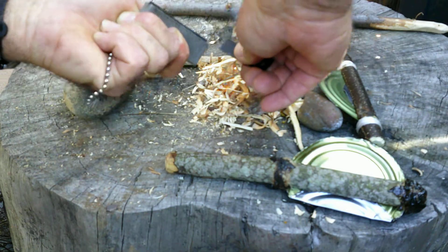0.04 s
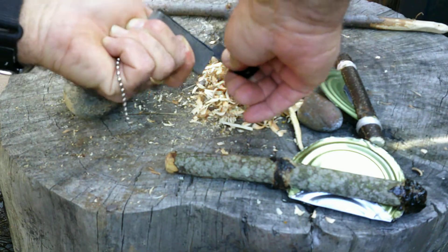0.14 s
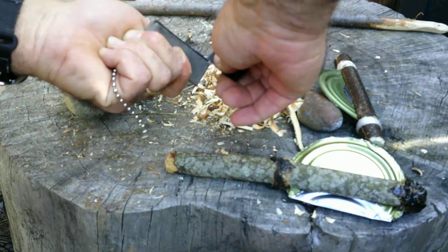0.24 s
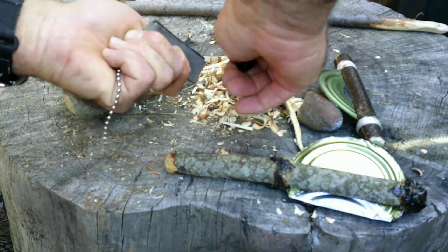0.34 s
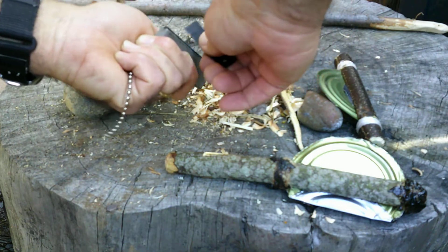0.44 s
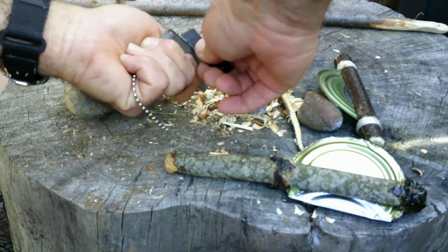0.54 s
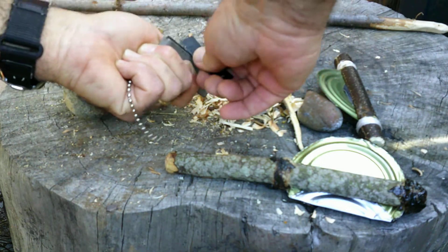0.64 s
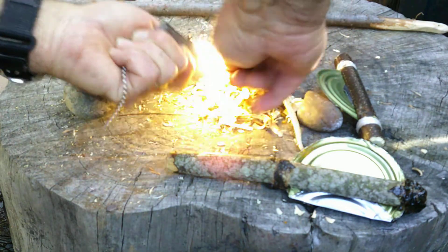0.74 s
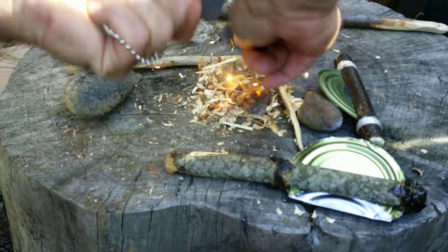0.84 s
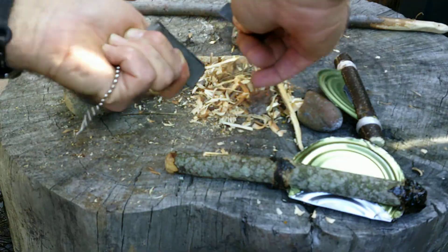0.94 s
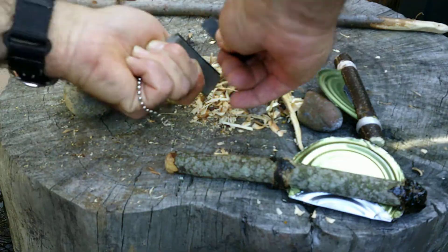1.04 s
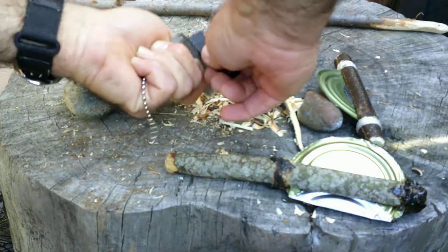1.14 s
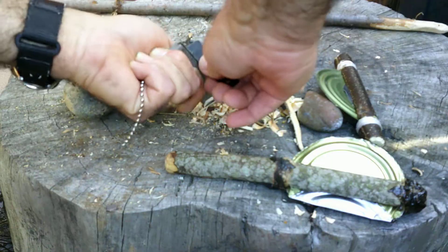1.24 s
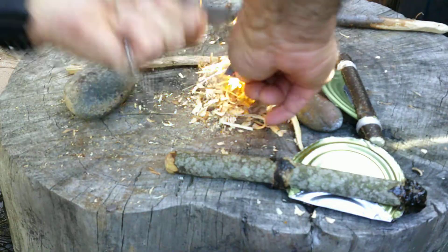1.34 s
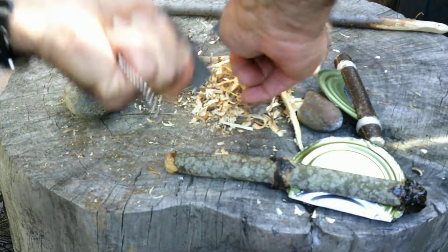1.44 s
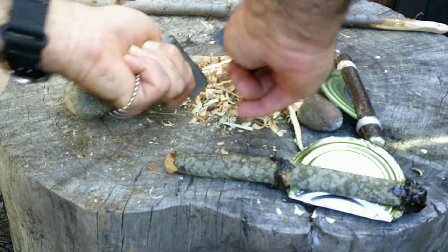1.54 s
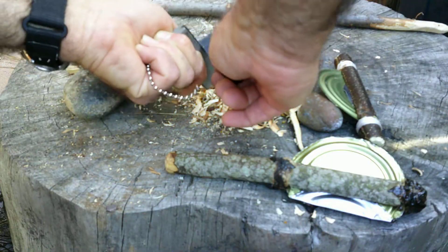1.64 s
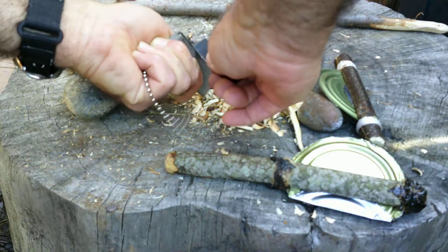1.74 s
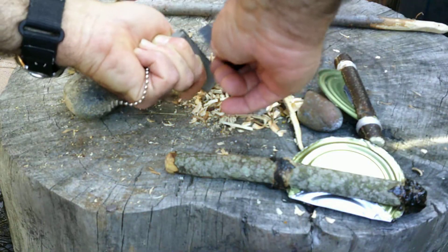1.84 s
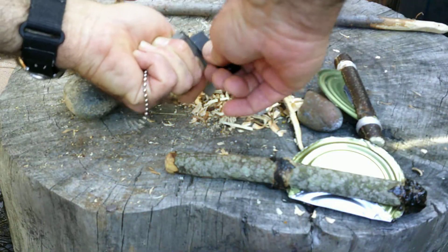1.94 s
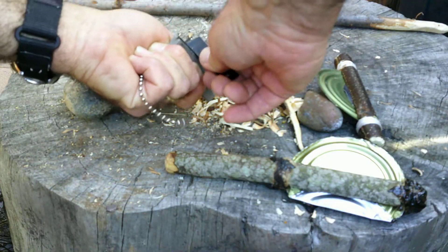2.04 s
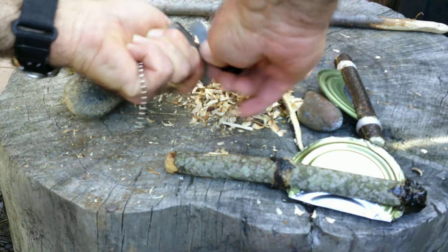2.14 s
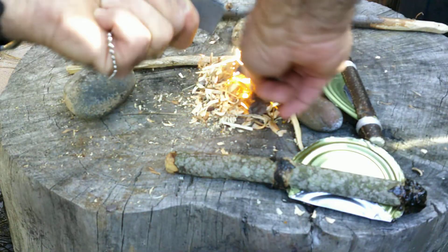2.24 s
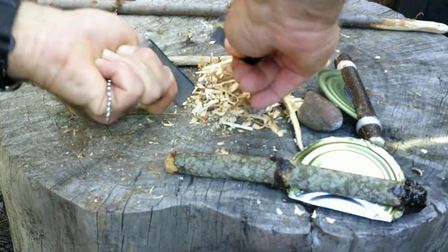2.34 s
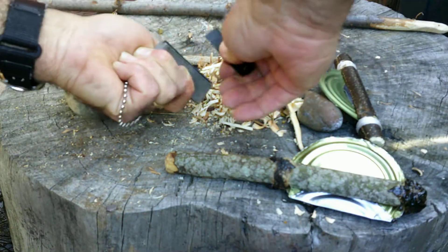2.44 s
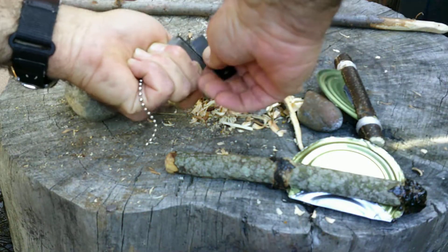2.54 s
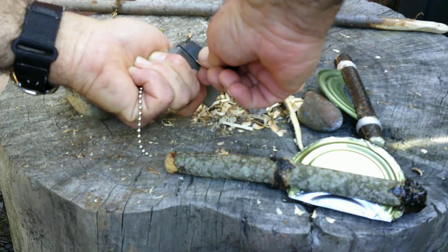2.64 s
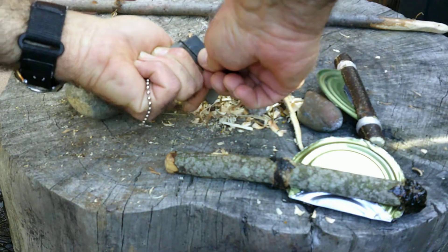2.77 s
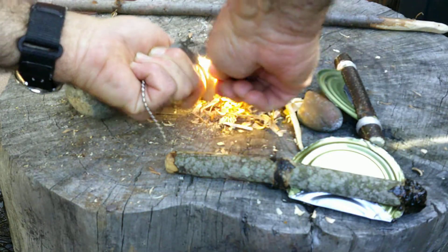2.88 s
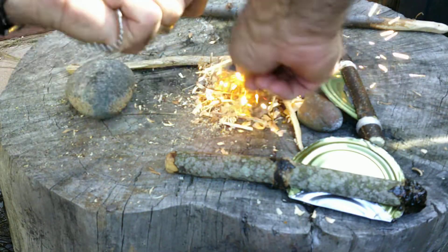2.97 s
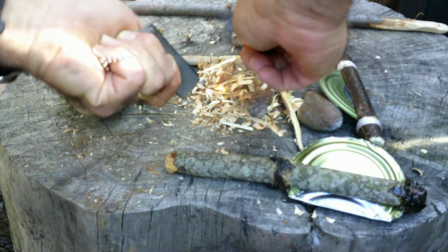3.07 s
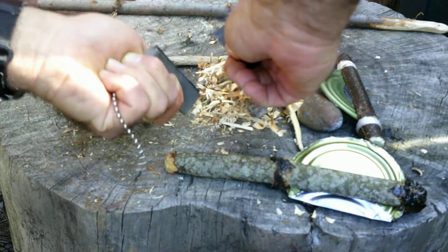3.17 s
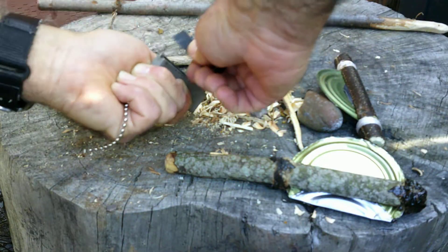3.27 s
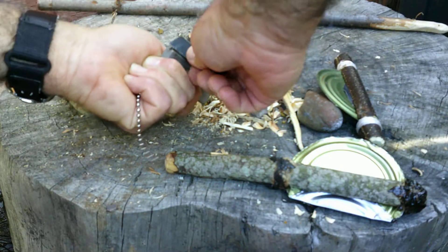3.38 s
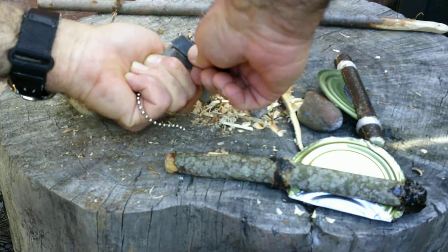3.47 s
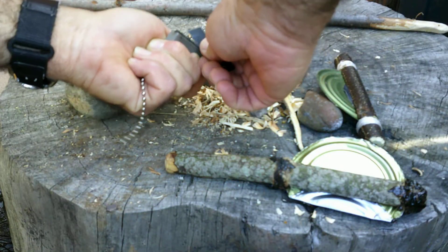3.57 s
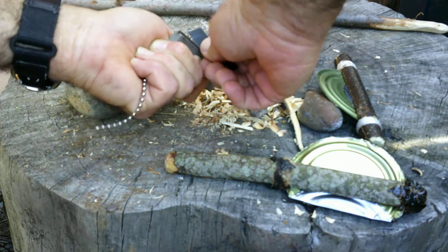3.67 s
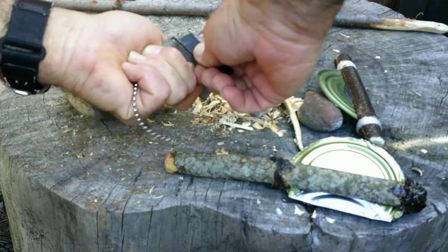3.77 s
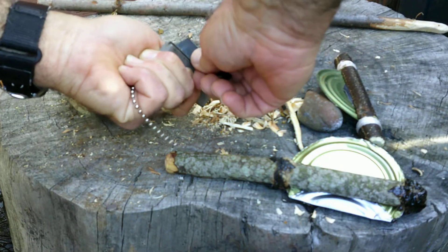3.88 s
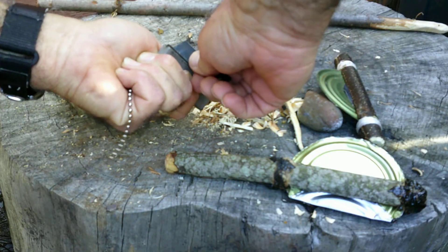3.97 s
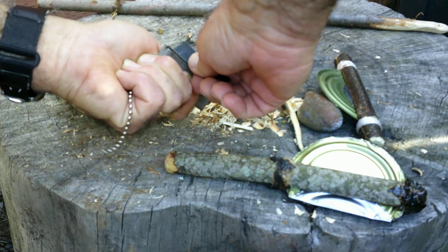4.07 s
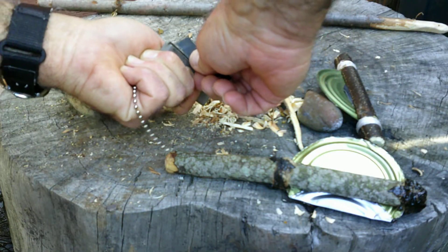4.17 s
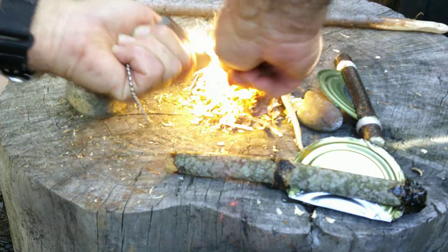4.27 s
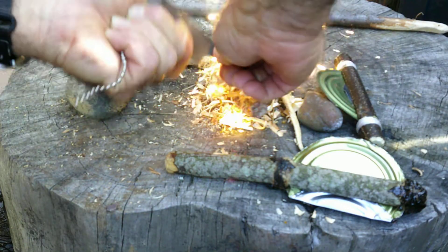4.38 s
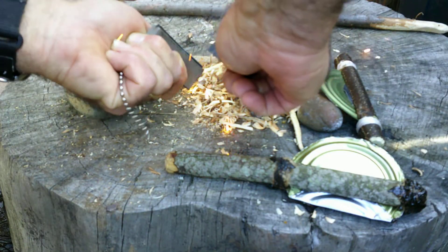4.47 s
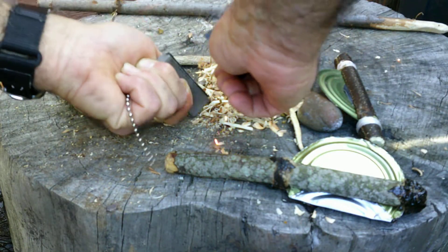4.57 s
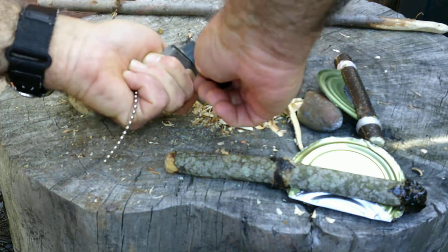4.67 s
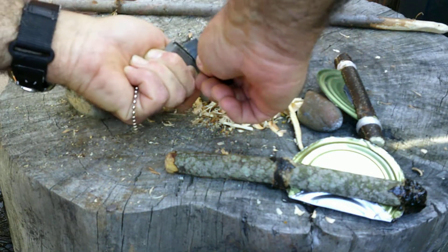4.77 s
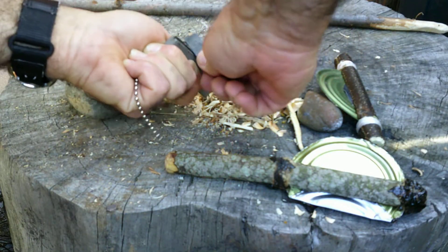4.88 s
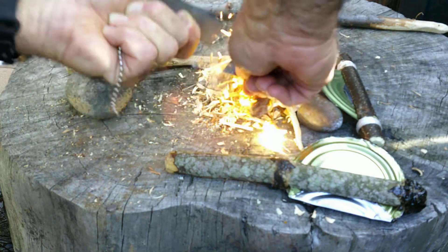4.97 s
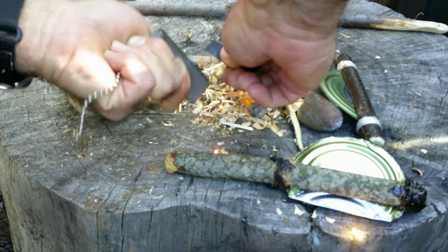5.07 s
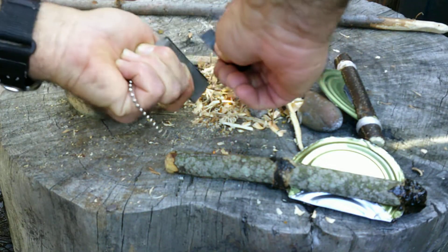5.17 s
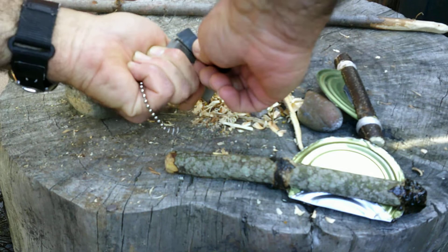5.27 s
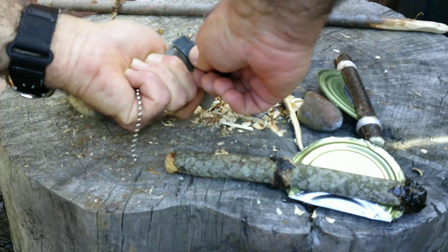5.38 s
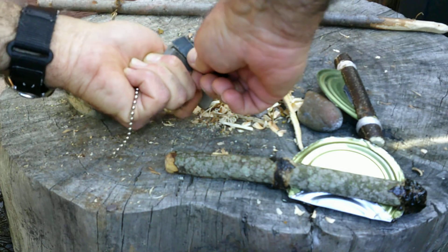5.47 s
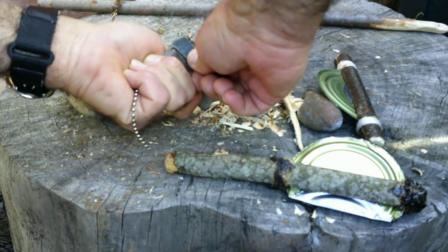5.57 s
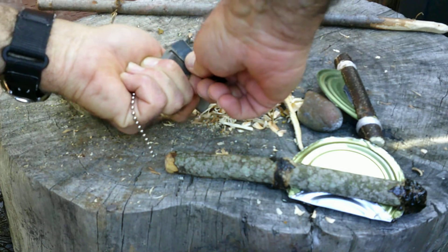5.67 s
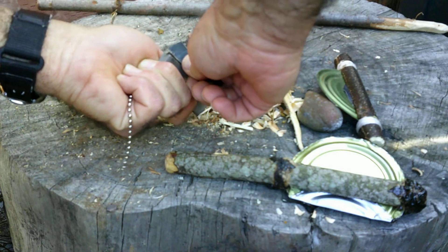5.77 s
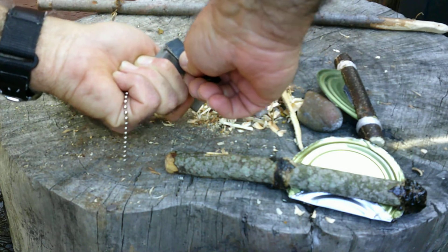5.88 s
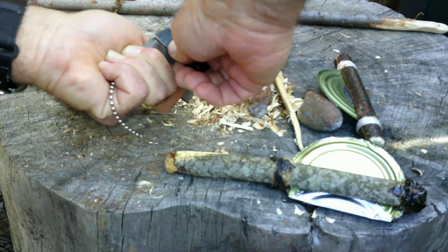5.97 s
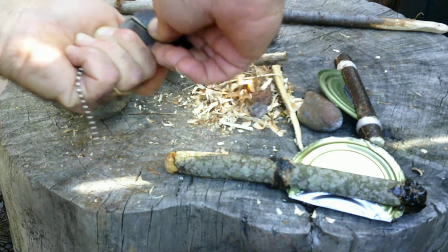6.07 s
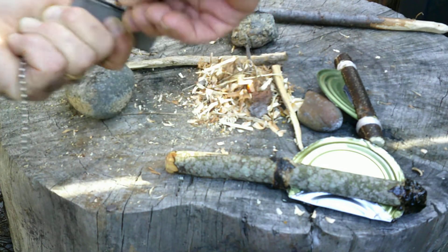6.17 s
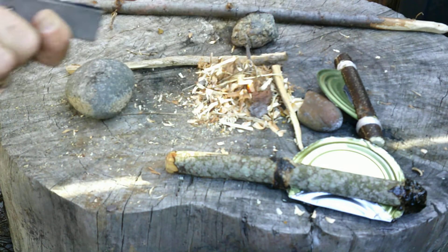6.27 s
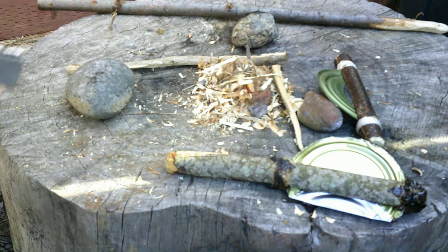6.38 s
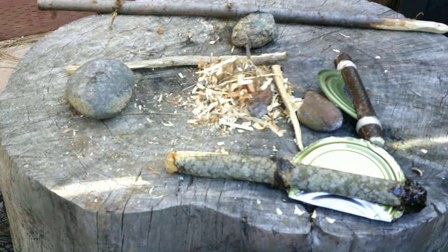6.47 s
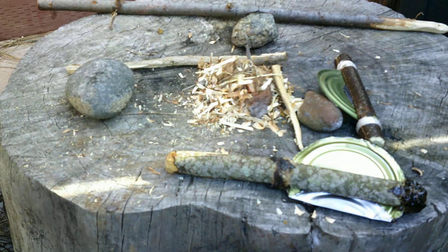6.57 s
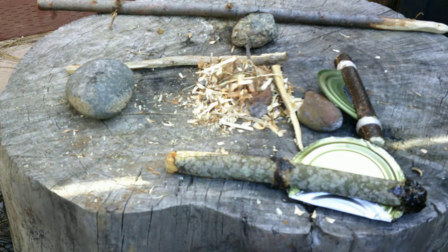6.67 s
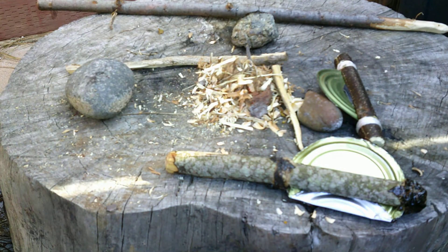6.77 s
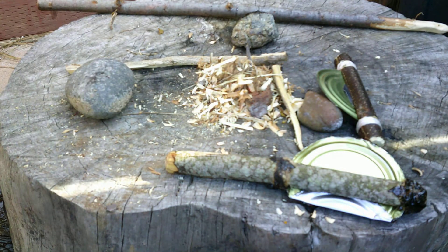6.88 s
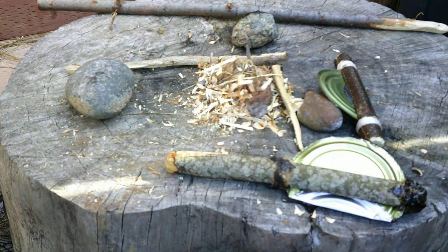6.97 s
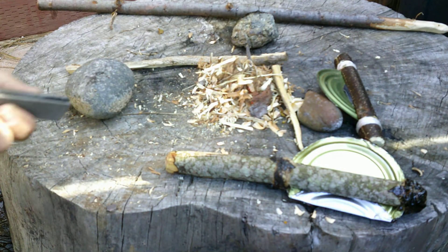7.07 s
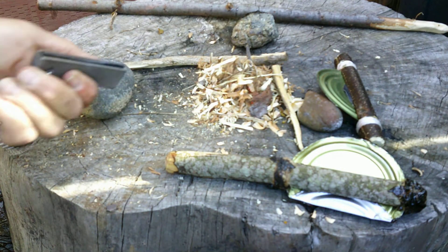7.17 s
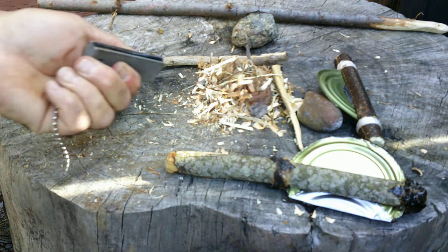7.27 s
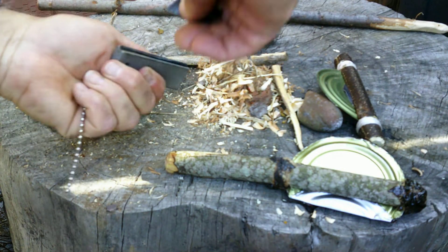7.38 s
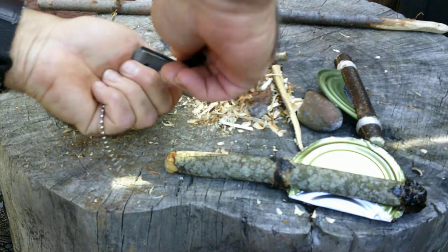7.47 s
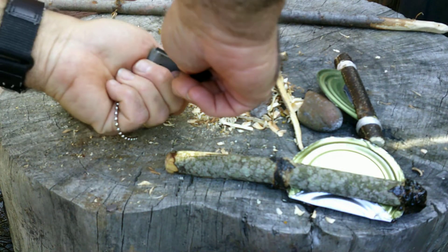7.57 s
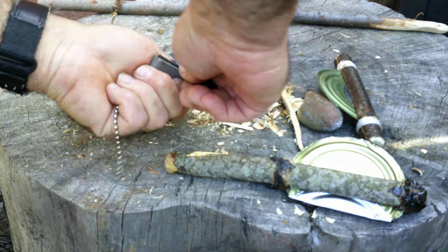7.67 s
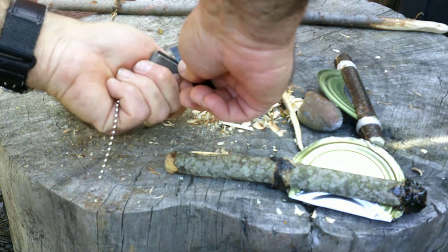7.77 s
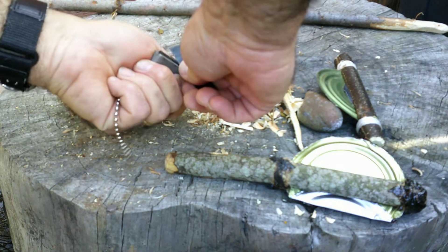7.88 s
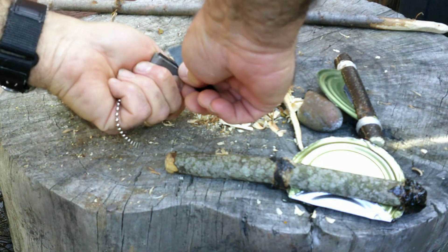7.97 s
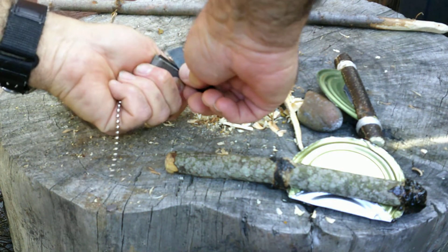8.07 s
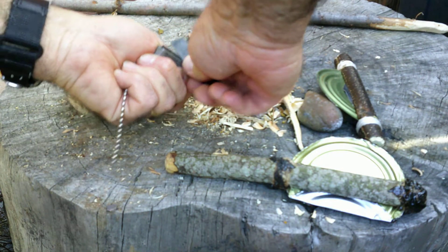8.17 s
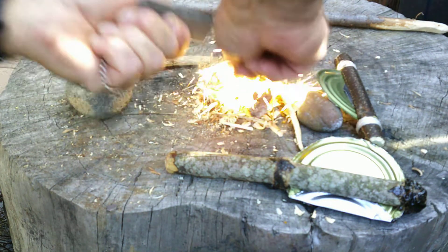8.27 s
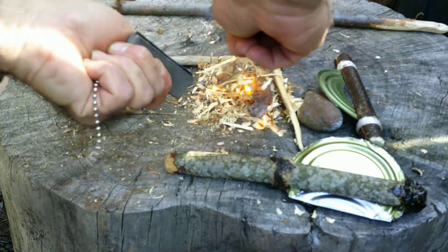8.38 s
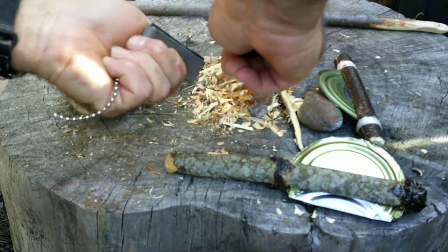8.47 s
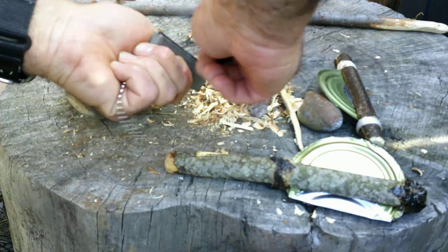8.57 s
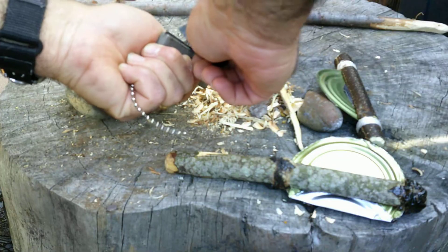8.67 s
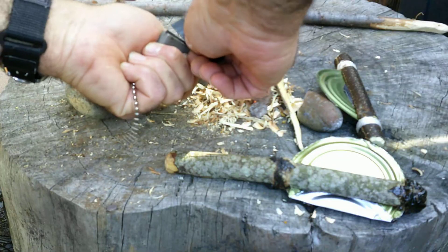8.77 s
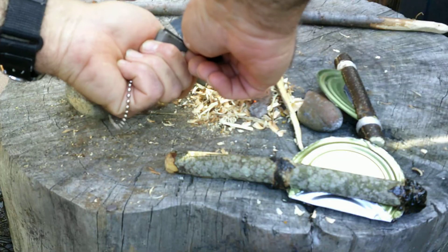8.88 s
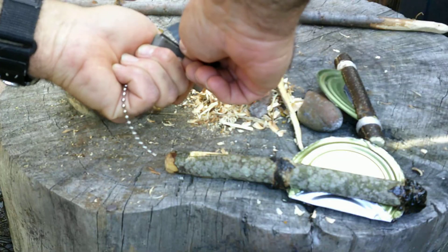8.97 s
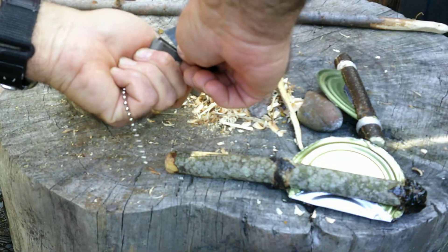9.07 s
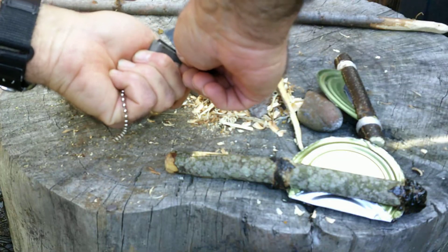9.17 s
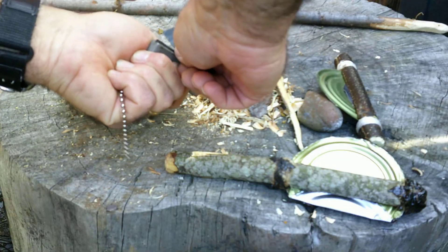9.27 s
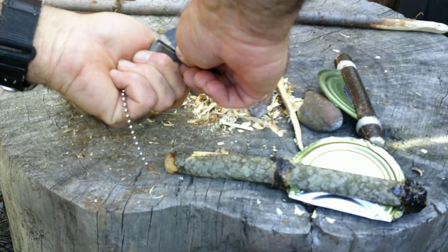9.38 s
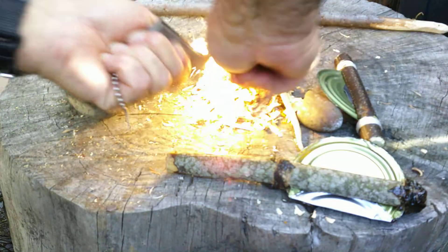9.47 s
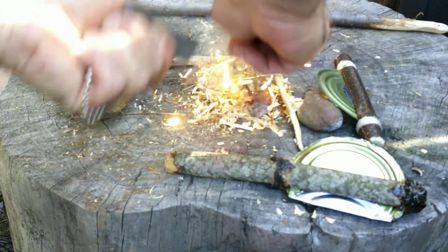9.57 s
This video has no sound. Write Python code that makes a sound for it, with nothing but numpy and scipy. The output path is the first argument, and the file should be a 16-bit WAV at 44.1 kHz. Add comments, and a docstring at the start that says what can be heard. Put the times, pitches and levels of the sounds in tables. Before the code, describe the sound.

Hands work at a wooden stump in the open air, heard close up in one channel with little reverberation and no extreme treble. Damped metallic ticks and light slides precede six very brief, tearing scrapes, each bursting into a soft flare and scattered sparks. Around the middle the scraping stops and dry shavings and twigs rustle gently. The steel is then set again for two louder snagging rasps. Faint bead clicks accompany the movement.

```python
"""Over an outdoor wash, a bead chain jingles, shavings stir, and steel slides and taps on a fire-starter rod.
Eight pushes of the scraper then rasp and snag (noise grains), each with a puff of sparks that crackle out.
Taps are damped modes; slides, rasp, sparks and shavings are random impulses shaped by spectra.
Hand motion drives jingle and stir: most after a stroke, least while aiming; in a pause the hands rummage."""
import sys
import numpy as np
from scipy import signal
from scipy.io import wavfile

SR = 44100
rng = np.random.default_rng(int(sys.argv[2]) if len(sys.argv) > 2 else 0)


def file_out(sig):
    """Save sig as 16-bit WAV at sys.argv[1]."""
    # one column per channel
    cols = np.atleast_2d(sig).T
    # limit, then scale
    lim = np.clip(cols, -1, 1)
    pcm = np.round(lim * 32767).astype(np.int16)
    wavfile.write(sys.argv[1], SR, pcm)


N = 424683  # samples

# pushes of the scraper: start t/s, push length/s, rasp level at the bite/dB, rasp level at the end/dB,
# treble relative level/dB, flare level/dB, burn-out t60/s
STROKES = [(0.699, .037, -49.5, -34, .5, -32.5, .1), (1.244, .051, -55, -33.5, -1, -36, 0.1),
           (2.122, 0.038, -44, -37, 1.5, -33, .1), (2.847, 0.039, -41.5, -35, -3.5, -33.5, 0.18),
           (4.213, .05, -48, -36, 2, -33, 0.2), (4.873, 0.045, -47.5, -32, -1.5, -35, .11),
           (8.161, .054, -50.5, -36.5, .5, -34, 0.26), (9.406, 0.053, -45.5, -36, 3.5, -32, .16)]
# spectrum of the cutting edge: f/Hz, density level/dB
RASP_SPECTRUM = [(150, -29.5), (900, -13.5), (1900, -8), (2350, -13.5), (2650, -3.5), (3400, -2),
                 (4250, -8.5), (4750, -14.5), (5500, -9), (6300, -5), (7100, -0.5), (7800, 2.5),
                 (8500, -14), (9200, -28)]
# hollows between hands and stump that colour the sparks: f/Hz, width/Hz, level/dB
HOLLOWS = [(202, 93, 2.5), (329, 45, 4.5), (454.7, 33, 5), (515, 45, 5), (559, 20, -5), (612, 31, 3.5),
           (674, 30, -8.5), (825, 36, 5.5), (996, 101, 11.5), (1288, 21, 4.5), (1424, 110, 6.5)]


def gain_of(db):
    """Decibel law: level to amplitude ratio."""
    return 10 ** (np.asarray(db) / 20)


def evened(x):
    """Power normalisation: scales to rms 1."""
    return x / np.sqrt(np.mean(x ** 2) + 1e-20)


def add(mix, s, sound):
    """Superposition: mixes a sound in at time s."""
    part = mix[max(round(s * SR), 0):][:len(sound)]
    part += sound[:len(part)]


def colour(x, points, peaks=(), size=4096):
    """Minimum-phase filter of unit energy, from a spectrum with peaks or dips on top of it."""
    hz = abs(np.fft.fftfreq(size, 1 / SR))
    f, db = np.transpose(points)
    db = np.interp(np.log(hz + 1), np.log(f), db)
    for centre, width, height in peaks:
        db = db + height / (1 + (2 * (hz - centre) / width) ** 2)
    # the Hilbert transform of the log gain gives the causal phase
    spectrum = np.exp(np.conj(signal.hilbert(np.log(gain_of(db)))))
    response = np.fft.ifft(spectrum).real
    return signal.fftconvolve(x, response / np.linalg.norm(response))[:len(x)]


def grains(count, per_s, spread_db):
    """Shot noise: random impulses of either sign, a few much larger than the rest, at rms 1."""
    size = gain_of(spread_db * np.minimum(rng.exponential(1, count), 4))
    sign = rng.choice([-1, 1], count)
    return evened(size * sign * (rng.random(count) < per_s / SR))


def burst(length, rise):
    """Envelope of a short gesture: a quick swell, a fade, and a low tail for 20 ms past its length."""
    u = np.arange(int((length + 0.02) * SR)) / SR / length
    return np.interp(u, [0, np.clip(rise, .01, .6), .7, 1.2], [0.25, 0.96, 0.7, 0.11])


def air(level_db=-59):
    """Stationary noise: the low, even wash of the outdoors."""
    # f/Hz, density level/dB
    air_spectrum = [(12, -39), (20, -12), (93, -3), (147, -3), (176, -3.5), (205, -6), (324, -10),
                    (369, -11.5), (501, -14.5), (857, -19), (974, -20.5), (2150, -26.5), (4870, -37.5),
                    (7720, -31.5), (9000, -55), (11700, -84.5), (19800, -120)]
    return gain_of(level_db) * colour(rng.standard_normal(N), air_spectrum)


def hand_motion(jolt_db=8.5, settle_s=.3, still_db=-8, aim_s=0.32):
    """Exponential relaxation: a gain jolted by each stroke, and unsettled at first; it falls before the next."""
    t = np.arange(N) / SR
    starts, pushes = np.transpose(STROKES)[:2]
    ends = starts + pushes
    done = np.searchsorted(ends, t)
    since = t - np.append(0, ends)[done]
    until = np.append(ends, np.inf)[done] - t
    return gain_of(jolt_db * np.exp(-since / settle_s) + still_db * np.exp(-until / aim_s))


def chain(motion, t60=0.016, jingle_db=-80):
    """Impact noise of tiny beads: sharp clicks, and a faint resonant shimmer that follows the hand."""
    # spectrum of a bead: f/Hz, density level/dB
    bead_spectrum = [(800, -41.5), (3000, -11), (5000, -25), (6500, -6.5), (7300, -3), (8100, 4.5),
                     (8700, -20)]
    # sharp clicks: t/s, level/dB
    clicks = [(.042, -50), (0.95, -47.5), (2.35, -55), (3.083, -49), (4.4553, -48.5), (5.1938, -41),
              (6.2528, -50.5), (6.7624, -51.5), (7.1822, -53)]
    t, out = np.arange(int(.04 * SR)) / SR, np.zeros(N)
    for s, db in clicks:
        add(out, s, gain_of(db - 60 * t / t60) * rng.standard_normal(len(t)))
    jingle = colour(grains(N, per_s=110, spread_db=3), bead_spectrum, [(7170, 170, 16), (7660, 120, 11)])
    return colour(out, bead_spectrum) + gain_of(jingle_db) * motion * jingle


def shavings(motion, stir_db=-74, rummage_db=-67, start_s=6.2, end_s=7.55, fade_s=0.11):
    """Granular friction: dry wood stirred by moving, rummaging hands; shavings and twigs are pushed aside."""
    # spectrum of dry wood: f/Hz, density level/dB
    wood_spectrum = [(120, -18), (250, -5.5), (450, -7.5), (860, -7), (1400, -15.5), (2600, -20.5),
                     (5000, -34), (7500, -26), (9000, -48.5)]
    # pushes among shavings and twigs: t/s, length/s, level/dB, crispness level/dB
    rustles = [(6.041, 0.065, -55, -1), (6.099, 0.075, -49.5, -6), (6.493, 0.021, -57, 9),
               (6.787, .014, -50, 9), (7.113, .018, -53.5, -4), (7.178, .01, -57, 18)]
    t = np.arange(N) / SR
    rummage = np.clip(np.minimum(t - start_s, end_s - t) / fade_s, 0, 1)
    level = np.hypot(gain_of(stir_db) * motion, gain_of(rummage_db) * rummage)
    stir = grains(N, per_s=4000, spread_db=2.5)
    out = level * colour(stir, wood_spectrum, [(920, 400, 1.4)])
    for s, length, db, crisp_db in rustles:
        level = gain_of(db) * burst(length, rise=0.32)
        rustle = level * grains(len(level), per_s=3000, spread_db=3.5)
        add(out, s, colour(rustle, wood_spectrum, [(2800, 1300, crisp_db), (1100, 760, 3)]))
    return out


def slides(chatter_width_hz=450, chatter_db=9, catch_hz=300, catch_swing_db=10):
    """Light sliding friction: dense slips of the edge, catching unevenly, with one resonance chattering along."""
    # spectrum of a light slide: f/Hz, density level/dB
    slide_spectrum = [(1000, -27), (1850, 1), (2300, -9), (2700, 0), (3500, -1.5), (4100, -9), (4800, -26),
                      (6600, -3.5), (8500, -23)]
    # the steel slides into place: t/s, length/s, level/dB, chatter f/Hz
    placings = [(0.035, .07, -71, 7600), (1.706, 0.04, -57.5, 1900), (2.566, 0.094, -62.5, 1870),
                (3.5, 0.054, -47.5, 3430), (8.669, 0.052, -57, 1950)]
    out = np.zeros(N)
    for s, length, db, hz in placings:
        level = gain_of(db) * burst(length, rise=0.24)
        n = np.arange(len(level))
        swing = np.interp(n / SR * catch_hz, n, rng.uniform(-1, 1, len(n)))
        catches = gain_of(catch_swing_db * swing)
        slips = level * evened(catches * grains(len(level), per_s=2500, spread_db=2.5))
        add(out, s, colour(slips, slide_spectrum, [(hz, chatter_width_hz, chatter_db)]))
    return out


def steel(low_db, high_db, grip_detune=0.012):
    """Modal superposition: the place of contact shares the blow among modes that the grip detunes a little."""
    # steel and rod, damped by the fingers: nominal f/Hz, level/dB, t60/s
    modes = [(950, -16, 0.022), (1810, -4.5, 0.02), (1984, -3, 0.016), (2746, -6, 0.017),
             (3333, -2.5, 0.012), (3570, -0.5, 0.01), (3970, -4.5, 0.011), (4245, -10, .014),
             (4940, -12.5, .014), (5680, -5, .01), (5980, -8, 0.017), (6600, -1.5, 0.0077),
             (7020, -6.5, 0.011), (7570, -4.5, 0.0089)]
    t = np.arange(int(.04 * SR)) / SR
    ring = np.zeros(len(t))
    for hz, db, t60 in modes:
        place_db = np.interp(hz, [2300, 3280, 4280, 5600], [low_db, 0, 0, high_db])
        cycles = hz * rng.normal(1, grip_detune) * t + rng.random()
        ring += gain_of(db + place_db - 60 * t / t60) * np.sin(2 * np.pi * cycles)
    # the contact takes a moment to build up
    return ring * np.minimum(t / 0.00039, 1)


def taps():
    """Impact excitation: the steel is set on the rod, and each knock rings its damped modes."""
    # t/s, middle modes level/dB, low modes relative level/dB, high modes relative level/dB
    knocks = [(.12, -43, -3, 7.5), (.4532, -35.5, -5.5, -4), (1.068, -26.5, -11, 3.5),
              (1.1686, -26.5, -2, -1), (1.5775, -33, -4.5, 9.5), (1.709, -44, 4, -7),
              (1.735, -42.5, -7, -2), (1.842, -38.5, -4.5, 9), (1.9184, -47.5, -2.5, -4),
              (2.5217, -33.5, -5, -2.5), (3.293, -30.5, -6, -26), (3.5247, -42, -8, -14),
              (4.6416, -26, -16, -6), (5.2535, -30, -4.5, -6), (6.2546, -51.5, -10, 5.5),
              (6.762, -57.5, -7, 8), (6.867, -60, 0, 4), (7.491, -34.5, -2, -3)]
    out = np.zeros(N)
    for s, db, low_db, high_db in knocks:
        add(out, s, gain_of(db) * steel(low_db, high_db))
    return out


def strokes(bite_s=0.0017, lag_s=.005, release_t60=0.058, dig_db=3, fizz_db=-8, swell_t60=.11,
            chatter_hz=450, chatter_swing_db=5, ember_db=-25, ember_t60=0.53):
    """Friction and combustion: the edge tears off chips ever harder; they ignite. Returns rasp and flare."""
    rasp, flare = np.zeros((2, N))
    t = np.arange(int(.45 * SR)) / SR
    high_pass = signal.butter(2, 5000, "high", fs=SR, output="sos")
    for s, push, bite_db, end_db, treble_db, flare_db, burn in STROKES:
        depth, after = np.minimum(t / push, 1), np.maximum(t - push, 0)
        force_db = bite_db + (end_db - bite_db) * depth - 60 * after / release_t60
        force = np.minimum(t / bite_s, 1) * gain_of(force_db)
        # the edge sticks and slips unevenly
        chatter = np.interp(t * chatter_hz, np.arange(len(t)), rng.uniform(-1, 1, len(t)))
        chips = evened(gain_of(chatter_swing_db * chatter) * grains(len(t), per_s=7000, spread_db=2))
        # a skimming edge hisses; as it digs in, the coarser grind below grows
        hiss = signal.sosfiltfilt(high_pass, chips)
        grind = gain_of(dig_db * (2 * depth ** 2 - 1)) * (chips - hiss)
        add(rasp, s, force * (gain_of(treble_db) * hiss + grind))
        # the flare swells to a peak just after the edge slips off, and a few embers burn on
        age = t - push - lag_s
        fire = gain_of(flare_db - 60 * np.maximum(age / burn, -age / swell_t60))
        embers = gain_of(flare_db + ember_db - 60 * abs(age) / ember_t60) * (age > 0)
        burning = fire + embers
        add(flare, s, burning * grains(len(t), per_s=7000, spread_db=1.5))
        add(rasp, s, gain_of(fizz_db) * burning * grains(len(t), per_s=2000, spread_db=1.0))
    return rasp, flare


def snags(t60=0.0072, squeak_width_hz=1100, squeak_db=8):
    """Stick-slip release: the edge catches hard and breaks free with a decaying crack and a brief squeak."""
    # t/s, level/dB, squeak f/Hz
    catches = [(.735, -25, 3230), (1.256, -40, 3200), (1.2734, -31, 7000), (2.135, -24, 6500),
               (2.852, -31.5, 3500), (2.8908, -23.5, 7050), (4.2505, -27, 7300), (4.880, -27, 6950),
               (4.923, -26, 6840), (8.2195, -20, 6160), (9.426, -23.5, 7100), (9.4587, -18, 6800),
               (9.4606, -21, 6340)]
    out, t = np.zeros(N), np.arange(int(.02 * SR)) / SR
    fade = gain_of(-60 * t / t60)
    for s, db, hz in catches:
        noise = fade * rng.choice([-1., 1.], len(t))
        crack = colour(noise, RASP_SPECTRUM, [(hz, squeak_width_hz, squeak_db)])
        # the squeak leaves the energy of the crack unchanged
        add(out, s, gain_of(db) * crack * np.linalg.norm(fade) / np.linalg.norm(crack))
    return out


def sparks():
    """Small explosions as shot noise: each stray spark gives a little fizz and a puff, returned apart."""
    # the largest sparks, which burst late, and at 8.572 s a knock that sounds alike: t/s, length/s, level/dB,
    # fizz relative level/dB
    large_sparks = [(.772, .019, -44.5, -4.5), (0.907, .0093, -53, -26), (2.973, 0.052, -52, -2.5),
                    (4.318, 0.021, -44, -5.5), (4.392, 0.017, -55.5, -6), (4.968, .012, -38.5, -6.5),
                    (5.085, 0.014, -54.5, -8), (8.302, .018, -48, -3), (8.346, 0.0051, -45.5, -6),
                    (8.572, .012, -50, -2.5), (9.58, .012, -50, -1.5)]
    fizz, puff = np.zeros((2, N))
    for s, length, db, fizz_db in [*large_sparks, *stray_sparks()]:
        level = gain_of(db) * burst(length, rise=0.15)
        add(puff, s, level * grains(len(level), per_s=5500, spread_db=4.0))
        add(fizz, s, gain_of(fizz_db) * level * grains(len(level), per_s=3300, spread_db=4.5))
    return fizz, puff


def stray_sparks(count=4, first_s=.07, last_s=.2, length_s=0.0062, db=-54, fade_db_per_s=35, fizz_db=-4):
    """Random arrivals: small sparks after every stroke, the later the weaker; rows as for the large ones."""
    rows = []
    for s, push, *_ in STROKES:
        for delay in first_s + (last_s - first_s) * rng.random(count):
            rows.append((s + push + delay, length_s, db - fade_db_per_s * delay, fizz_db))
    return rows


def whirr(s=4.558, length=0.046, hz=430, db=-48, rush_db=-2):
    """Periodic pulsation: one spinning spark flutters past, slowing a little, in a rush of noise."""
    t = np.arange(int(length * SR)) / SR
    turns = hz * t * (1 + (1 - t / length) / 20)
    pulses = evened(np.maximum(np.sin(2 * np.pi * turns), -.5))
    rush_spectrum = [(120, -8), (400, 0), (900, -9), (2100, -17), (4000, -37)]  # f/Hz, density level/dB
    rush = colour(rng.standard_normal(len(t)), rush_spectrum, HOLLOWS)
    out = np.zeros(N)
    add(out, s, gain_of(db) * np.hanning(len(t)) * (pulses - pulses.mean() + gain_of(rush_db) * rush))
    return out


def surroundings(x, echo_s=.0064, echo_db=-19, near_db=-15, near_t60=0.045, far_db=-29, far_t60=0.56):
    """Reflection and reverberation: a close echo, scatter from hands and stump, a faint return from the yard."""
    t = np.arange(SR // 2) / SR
    response = np.zeros(len(t))
    for db, t60 in [(near_db, near_t60), (far_db, far_t60)]:
        tail = rng.standard_normal(len(t)) * gain_of(-60 * t / t60) * (t > .002)
        response += gain_of(db) * tail / np.linalg.norm(tail)
    response[0] += 1  # direct sound
    response[round(echo_s * SR)] += gain_of(echo_db)
    return signal.fftconvolve(x, response)[:N]


def scene():
    """Linear superposition of all sources, in one channel."""
    # spectrum of burning sparks: f/Hz, density level/dB
    flare_spectrum = [(60, -31), (110, -16.5), (160, -3), (240, -5), (500, -6.5), (1000, -8), (1200, -16.5),
                      (2000, -7), (2300, -26.5), (3200, -18.5), (5000, -29), (9000, -42.5)]
    motion = hand_motion()
    stirring = chain(motion) + shavings(motion)
    rasp, flare = strokes()
    fizz, puff = sparks()
    scraping = slides() + taps() + colour(rasp + fizz, RASP_SPECTRUM) + snags()
    burning = colour(flare + puff, flare_spectrum, HOLLOWS) + whirr()
    return (air() + surroundings(stirring + scraping + burning))[None]


def record(dry, edge_hz=8900):
    """Band limitation: a linear-phase low-pass removes the highest treble."""
    low_pass = signal.firwin(241, edge_hz, window=("kaiser", 8), fs=SR)
    return signal.oaconvolve(dry, low_pass[None], "same")


dry = scene()
out = record(dry)
file_out(out)
```